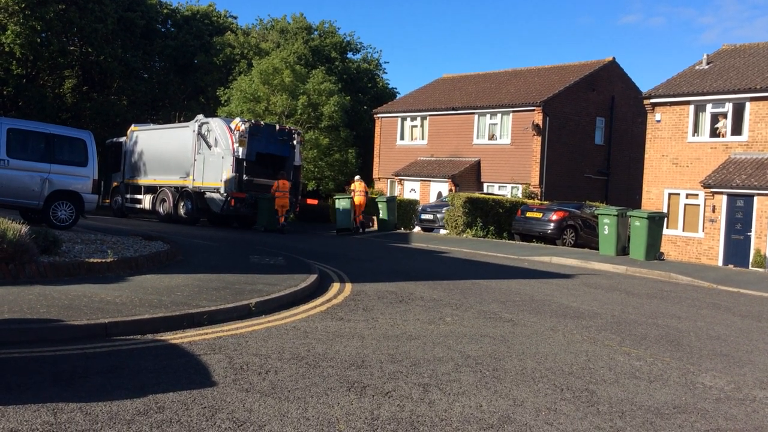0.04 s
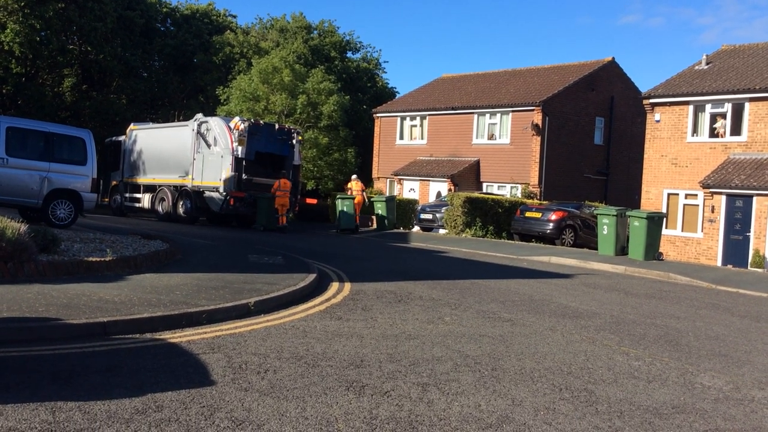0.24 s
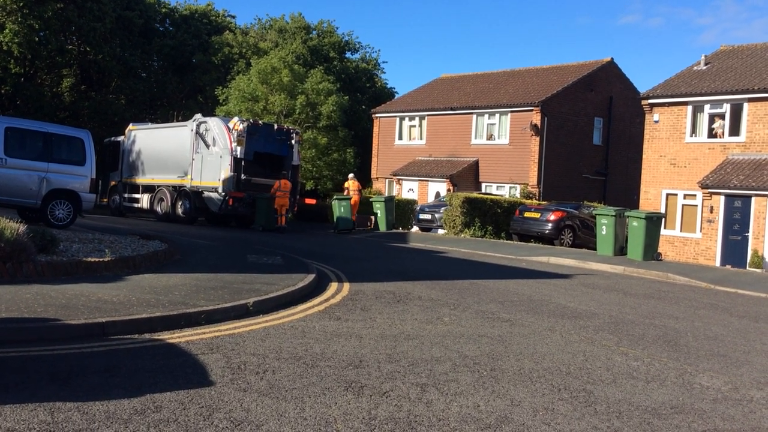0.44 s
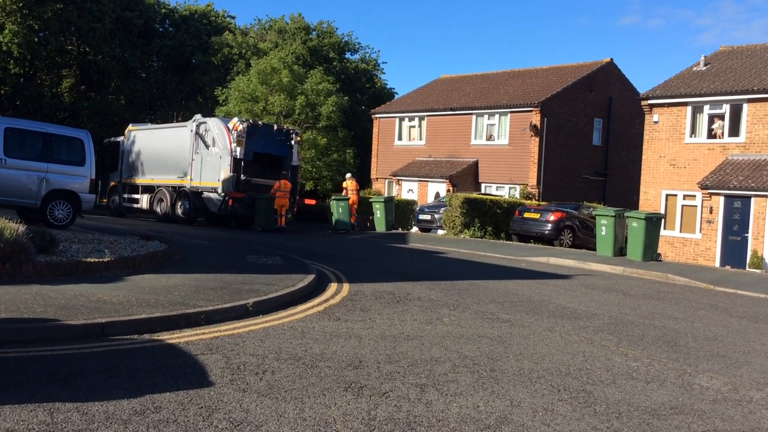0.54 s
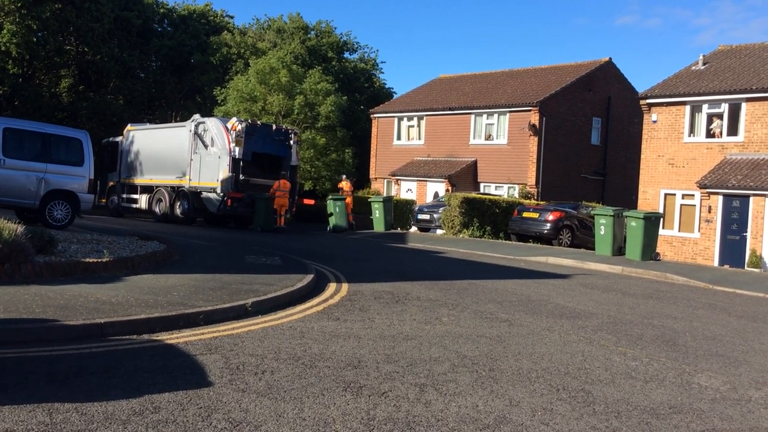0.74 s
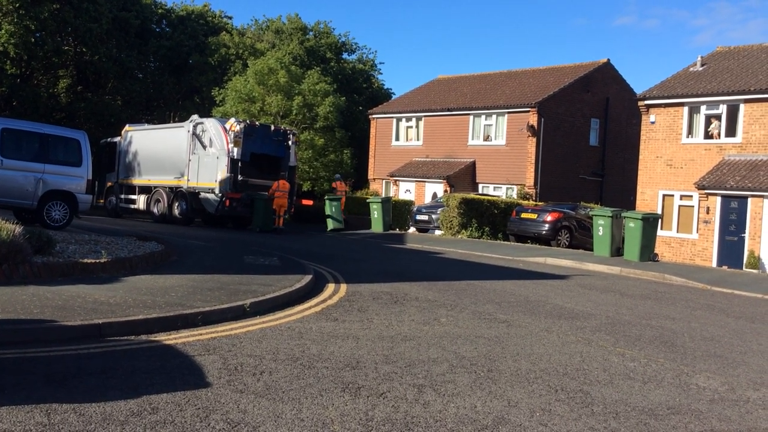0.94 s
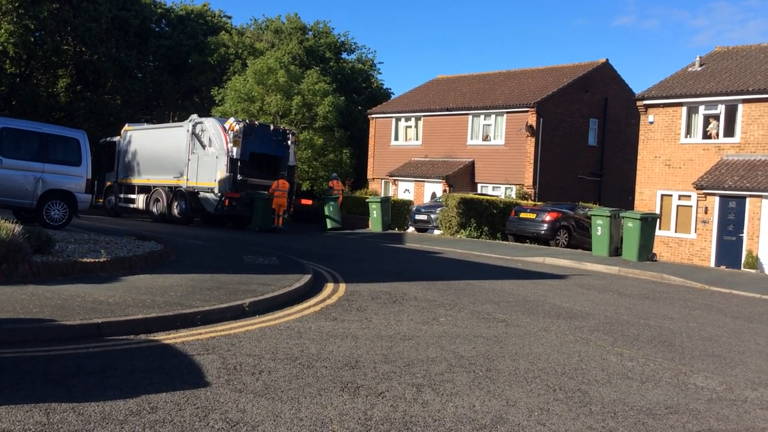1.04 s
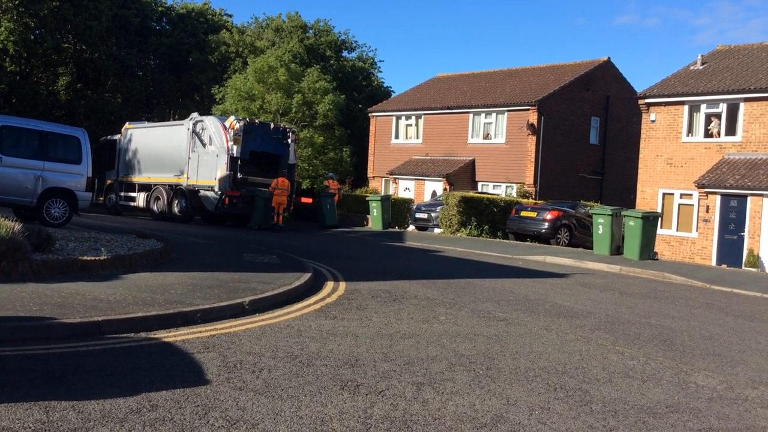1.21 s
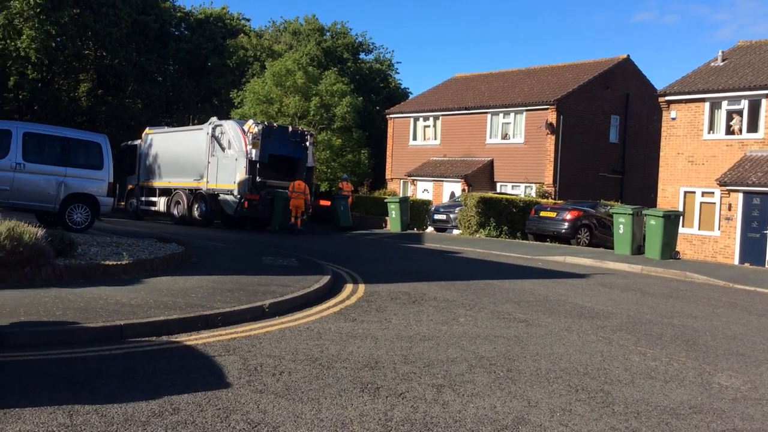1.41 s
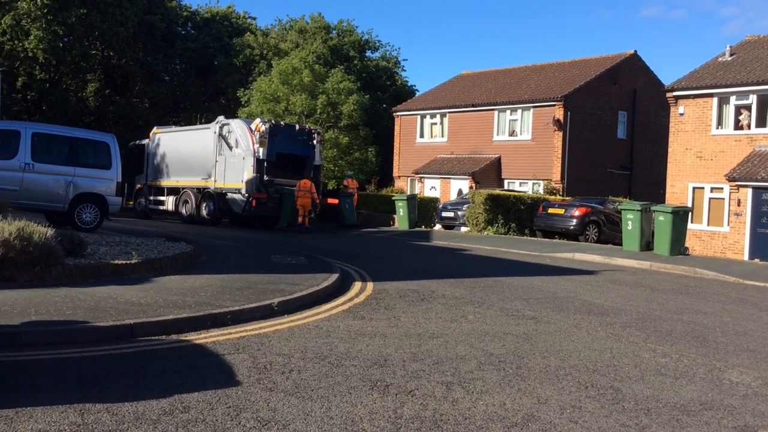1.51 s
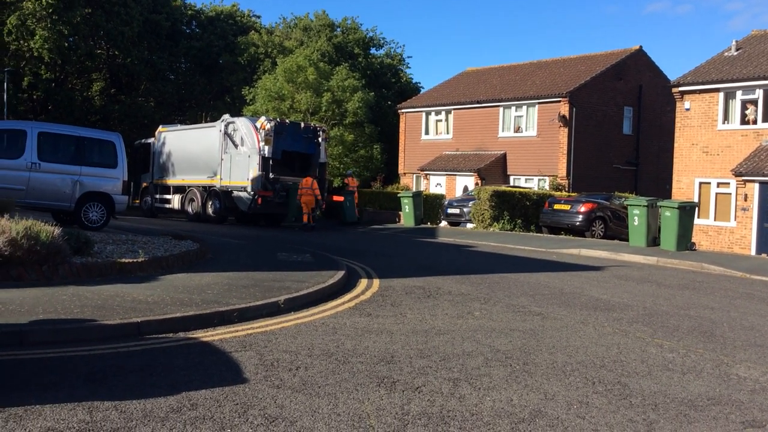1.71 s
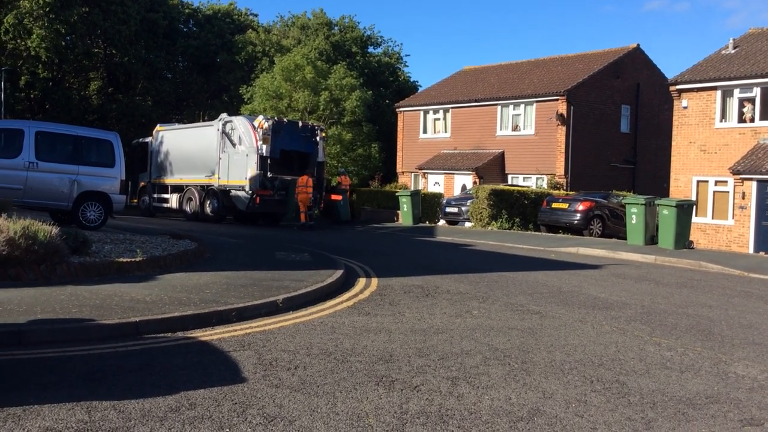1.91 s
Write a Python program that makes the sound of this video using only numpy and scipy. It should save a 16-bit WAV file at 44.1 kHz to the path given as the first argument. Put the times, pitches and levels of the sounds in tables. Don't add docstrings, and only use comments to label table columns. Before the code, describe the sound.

Bin collection on a residential street: rattling plastic bins, one bright metallic clank and a boomy thump straight after, then lighter clicks and knocks, with low diesel hum behind, faint house-front echoes and thin, mid-forward microphone sound.

```python
import sys
import numpy as np
from scipy import signal
from scipy.fft import rfft, irfft
from scipy.io import wavfile
from scipy.ndimage import uniform_filter1d

SR = 44100
rng = np.random.default_rng(int(sys.argv[2]) if len(sys.argv) > 2 else 0)


def natural_amplitude(level_db):
    exponent = np.asarray(level_db, float) / 20
    return 10 ** exponent


def store_pcm(level_fs):
    pcm = np.round(np.clip(level_fs, -1, 1) * 32767).astype(np.int16)
    wavfile.write(sys.argv[1], SR, np.atleast_2d(pcm).T)


N = 85995

# pitch_hz [Hz], level_db [dB], t60_s [s]
BIN_MODES = [(86, -22, 0.1), (123, -10.5, 0.046), (198, -7.5, 0.047), (261, -8.5, 0.12), (305, -3, 0.062),
             (357, -7, 0.21), (409, -2, 0.074), (455, 1.5, 0.079), (540.2, -2.5, 0.13), (608, -7, 0.025),
             (853, -11.5, 0.087), (1040, -41, 0.035)]


def evened(x):
    return x / np.sqrt(np.mean(x ** 2) + 1e-20)


def read(points, hz):
    point_hz, value = np.transpose(points)
    return np.interp(np.log(hz + 1), np.log(point_hz + 1), value)


def add(mix, start_s, sound):
    part = mix[round(start_s * SR):][:len(sound)]
    part += sound[:len(part)]


def coloured(x, tilt_db=0.):
    # pitch_hz [Hz], level_db [dB]
    ground_path = [(25, -27), (55, -22), (75, -9), (300, -15), (560, -14), (720, -23), (950, -16),
                   (1500, -16.5)]
    # pitch_hz [Hz], level_db [dB]
    microphone_curve = [(2050, -21.5), (2400, -20), (2850, -11), (3550, -8.5), (4100, -16), (4800, -25.5),
                        (6200, -27),
                        (7600, -36.5), (9300, -33.5), (10600, -37), (11600, -46), (13000, -43), (15000, -48),
              (16500, -69)]
    hz = np.fft.rfftfreq(4096, 1 / SR)
    level_db = read(ground_path + microphone_curve, hz) + tilt_db * np.log2((hz + 20) / 1000)
    cepstrum = irfft(np.log(natural_amplitude(np.maximum(level_db, -120))))
    cepstrum = np.r_[cepstrum[0], 2 * cepstrum[1:2048], np.zeros(2048)]
    impulse = irfft(np.exp(rfft(cepstrum)))
    return evened(signal.oaconvolve(x, impulse)[:len(x)])


def waver(hz, width_hz):
    steady = 2.2
    pole = np.exp(-np.pi * width_hz / SR)
    noise = rng.standard_normal(N) + 1j * rng.standard_normal(N)
    drift = signal.lfilter([1], [1, -pole], noise)
    carrier = np.exp(2j * np.pi * hz * np.arange(N) / SR)
    return evened(((steady + drift / np.std(drift)) * carrier).real)


def fan_wash():
    idle_db, patch_db, knock_db, firing_hz = -49, 1.48, 0.5, 31.7
    real, imag, patches = rng.standard_normal((N // 128 + 5, 257, 3)).T
    patches = uniform_filter1d(patches, 6, 0)
    patches = evened(uniform_filter1d(patches, 14, 1))
    spectrum = (real + 1j * imag) * natural_amplitude(patch_db * patches)
    wash = signal.istft(spectrum, nperseg=512, noverlap=384)[1][:N]
    firing = np.cos(2 * np.pi * firing_hz * np.arange(N) / SR)
    return natural_amplitude(idle_db) * coloured(wash * natural_amplitude(knock_db * firing))


def engine_hum():
    # pitch_hz [Hz], level_db [dB]
    hum_lines = [(91.5, -62), (129.2, -62.5), (195, -57), (263.8, -62.5), (355.3, -63.5)]
    return sum(natural_amplitude(level_db) * waver(pitch_hz, 3) for pitch_hz, level_db in hum_lines)


def pump_whine():
    whine_hz, width_hz, whine_db = 980, 3.9, -63
    from_s, rise_s = 1.1, 0.5
    swell = np.clip((np.arange(N) / SR - from_s) / rise_s, 0, 1)
    return natural_amplitude(whine_db) * swell * waver(whine_hz, width_hz)


def idle():
    return fan_wash() + engine_hum() + pump_whine()


def ring(modes, spread_db=0., detune=0.):
    hz, level_db, t60_s = np.transpose(modes)[:, :, None]
    shade, shift = rng.standard_normal((2, len(modes), 1))
    t = np.arange(SR // 4) / SR
    height = natural_amplitude(level_db + spread_db * shade - 60 * t / np.maximum(t60_s, .005))
    y = (height * np.sin(2 * np.pi * hz * (1 + detune * shift) * t)).sum(0)
    return y / abs(y).max()


def trundle():
    # time_s [s], level_db [dB]
    effort = [(0.0, -44.5), (0.216, -43.5), (0.238, -42), (0.322, -40.5), (0.345, -35.5), (0.433, -44.5),
              (0.466, -41.5), (1.074, -52), (1.586, -43.5), (1.695, -49), (1.758, -48.5), (1.872, -51.5),
              (1.928, -42), (1.95, -43)]
    bumps_per_s, boom_db, spots = 260, -3, 8
    level_db = np.interp(np.arange(N) / SR, *np.transpose(effort))
    bumps = (rng.random(N) < bumps_per_s / SR) * rng.choice([-1., 1.], N)
    spot = rng.integers(0, spots, N)
    soft_contact = np.hanning(90)
    boom = np.zeros(N)
    for k in range(spots):
        body = np.convolve(ring(BIN_MODES, 7.3, 0.052), soft_contact)
        boom += signal.oaconvolve(bumps * (spot == k), body)[:N]
    shaking = signal.lfilter([1], [1, -.995], abs(bumps))
    rattle = coloured(shaking * rng.standard_normal(N), 4.4)
    rattle_db = -69.5 + 1.26 * (level_db + 48.5)
    return natural_amplitude(boom_db + level_db) * evened(boom) + natural_amplitude(rattle_db) * rattle


def burst(tilt_db, t60_s, rise_s):
    t = np.arange(SR // 4) / SR
    noise = coloured(rng.standard_normal(len(t) + 2048), tilt_db)[2048:]
    return noise * np.minimum(t / rise_s, 1) * natural_amplitude(-60 * t / max(t60_s, .005))


def ticks():
    # start_s [s], peak_db [dB], tilt_db [dB per octave], t60_s [s]
    clicks = [(0.0315, -33.5, 1, 0.075), (0.0465, -37.5, 4.5, 0.15), (0.0728, -34.5, -5, 0.045),
              (0.108, -29.5, -4, 0.091), (0.1309, -38.5, 2, 0.077), (0.184, -35, 3.5, 0.059),
              (0.1958, -38, -2, 0.26), (0.2712, -39, -6, 0.047), (0.3264, -25, -5.5, 0.094),
              (0.3774, -39, 1, 0.17), (0.3957, -28.5, -5.5, 0.15), (0.58, -31.5, -5.5, 0.067),
              (0.6534, -50, 6, 0.06), (0.843, -46, 2, 0.058), (1.1123, -41.5, 2, 0.076),
              (1.1927, -49, 5, 0.041), (1.335, -32, -4.5, 0.065), (1.5688, -28, -5, 0.033),
              (1.6206, -36, -5.5, 0.057), (1.767, -46, -2.5, 0.084), (1.914, -29, -7.5, 0.089)]
    out = np.zeros(N)
    for start_s, peak_db, tilt_db, t60_s in clicks:
        add(out, start_s, natural_amplitude(peak_db - 7) * burst(3.0 + tilt_db, t60_s, 0.003))
    return out


def pings():
    # start_s [s], pitch_hz [Hz], level_db [dB], t60_s [s]
    small_steel = [
        (0.086, 5860, -52.5, 0.19),
        (.11, 9450, -53, 0.096),
        (0.045, 7840, -50, .05),
        (0.396, 10100, -49, .12),
        (.395, 15000, -65, .1),
        (.832, 8700, -59, .15),
        (1.11, 8760, -56, 0.08),
        (.715, 12000, -64, .08),
    ]
    out = np.zeros(N)
    for start_s, pitch_hz, level_db, t60_s in small_steel:
        pair = [(pitch_hz, 0, t60_s), (pitch_hz * 1.012, -5, t60_s)]
        add(out, start_s, natural_amplitude(level_db) * ring(pair))
    return out


def thuds():
    # start_s [s], peak_db [dB], favoured pitch_hz [Hz]
    knocks = [(0.05, -36, 200), (0.111, -33, 300), (0.192, -39, 250), (0.232, -38, 180), (0.328, -24, 410),
              (.329, -29, 120), (.332, -33, 850), (0.339, -24, 545), (0.347, -31, 230), (.352, -33, 120),
              (.373, -26, 440), (.390, -27, 350), (.404, -29, 540), (0.423, -27, 110), (.44, -33, 260),
              (.58, -35, 403), (.61, -35, 353), (.66, -37, 270), (.715, -34, 355), (0.901, -39, 90),
              (1.372, -37, 350), (1.444, -35, 272), (1.555, -35, 370), (1.567, -36, 520), (1.765, -32, 400),
              (1.915, -35, 400), (1.925, -41, 120)]
    focus_db, rise_s, t60_max_s = 30, 0.002, .13
    out = np.zeros(N)
    for start_s, peak_db, near_hz in knocks:
        modes = []
        for hz, level_db, t60_s in BIN_MODES:
            away = abs(np.log2(hz / near_hz))
            modes.append((hz, level_db - focus_db * away, min(t60_s, t60_max_s)))
        knock = ring(modes, 0.5, 0.028)
        onset = np.minimum(np.arange(len(knock)) / SR / rise_s, 1)
        add(out, start_s, natural_amplitude(peak_db) * knock * onset)
    return out


def clank():
    # pitch_hz [Hz], level_db [dB], t60_s [s]
    latch_modes = [(1200, -15, 0.07), (1645, -20, 0.05), (1930, -20, 0.05), (2546, -10, 0.06),
                   (3170, -1, 0.025), (3575, -3, 0.06), (3800, -9, 0.035), (4027, -9, 0.05),
                   (4215, -8, 0.03), (4670, -14, 0.05), (6015, -17, 0.045), (6670, -22, 0.04),
                   (7775, -26, 0.05), (9232, -20, 0.03)]
    # start_s [s], peak_db [dB]
    latch_blows = [
        (.2292, -26),
        (.2308, -18),
        (.2319, -12),
        (.2342, -14),
        (.2356, -16),
        (.2398, -19),
        (.2435, -23),
        (.2495, -28),
    ]
    out = np.zeros(N)
    for start_s, peak_db in latch_blows:
        add(out, start_s, natural_amplitude(peak_db + 1) * ring(latch_modes, 1.5, 0.008))
        add(out, start_s, natural_amplitude(peak_db - 9) * burst(6.1, t60_s=.016, rise_s=.0004))
    shiver = natural_amplitude(-26.5) * burst(5.5, t60_s=.12, rise_s=.003)
    add(out, latch_blows[0][0], shiver)
    return out


def street(x):
    # pitch_hz [Hz], t60_s [s]
    street_decay = [(100, 0.31), (500, 1), (2000, 0.76), (8000, 0.31)]
    gap_s, spacing = 0.0023, 20
    slots = np.arange(0, SR - spacing, spacing)
    taps = np.zeros(SR)
    taps[slots + rng.integers(0, spacing, len(slots))] = rng.choice([-1., 1.], len(slots))
    hz, t, bands = signal.stft(taps, SR, nperseg=256)
    fade = natural_amplitude(-60 * t / read(street_decay, hz)[:, None])
    tail = signal.istft(bands * fade, SR, nperseg=256)[1]
    tail = tail * np.clip(np.arange(len(tail)) / SR / gap_s - 1, 0, 1)
    return signal.fftconvolve(x, tail / np.linalg.norm(tail))[:N]


def scene():
    street_db = -8.5
    hits = ticks() + pings() + thuds() + clank()
    return (idle() + trundle() + hits + natural_amplitude(street_db) * street(hits))[None]


def roll_off(x):
    return signal.sosfilt(signal.butter(12, 15750, fs=SR, output="sos"), x)


def record(dry):
    edges = signal.butter(4, [58, 15200], "band", fs=SR, output="sos")
    mix = signal.sosfilt(edges, dry)
    return roll_off(mix)


dry = scene()
out = record(dry)
store_pcm(out)
```